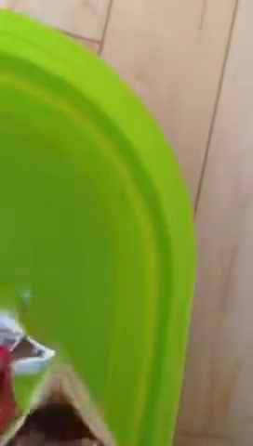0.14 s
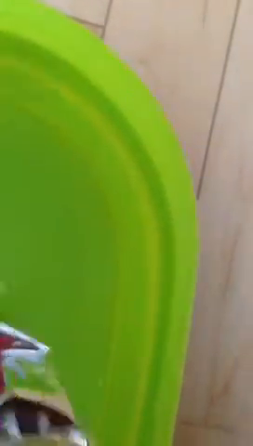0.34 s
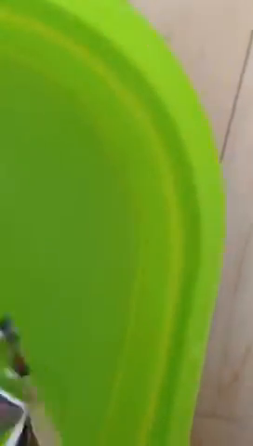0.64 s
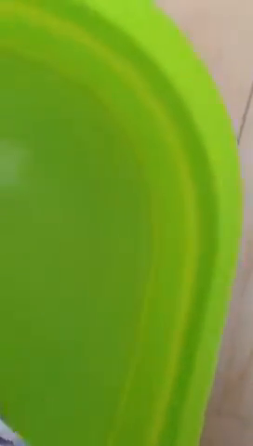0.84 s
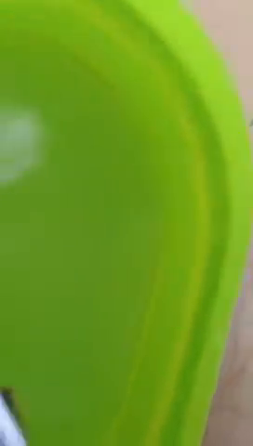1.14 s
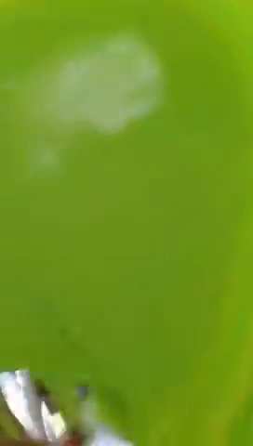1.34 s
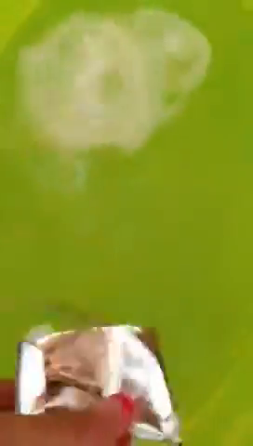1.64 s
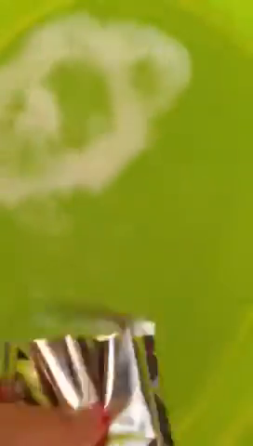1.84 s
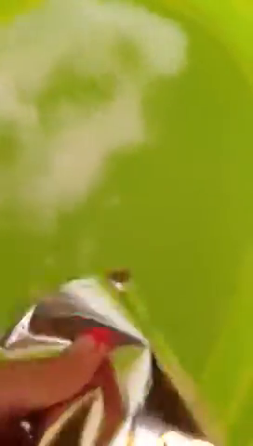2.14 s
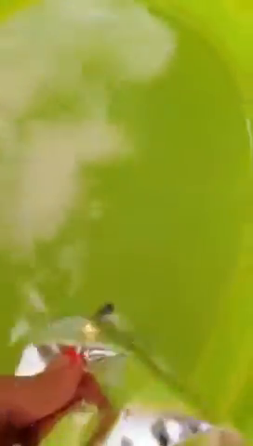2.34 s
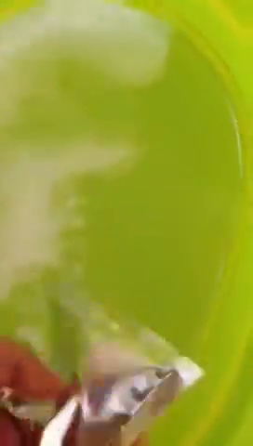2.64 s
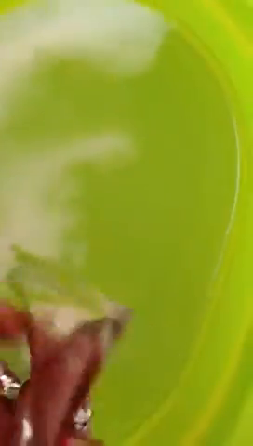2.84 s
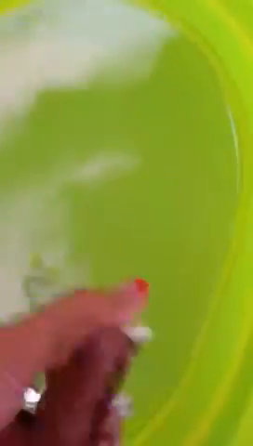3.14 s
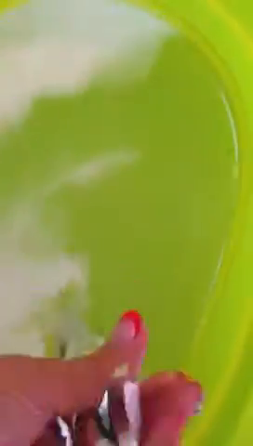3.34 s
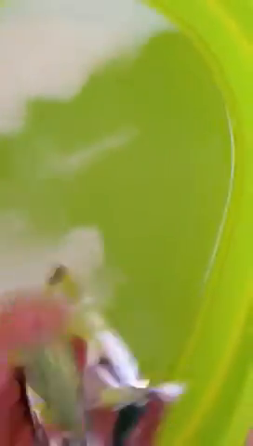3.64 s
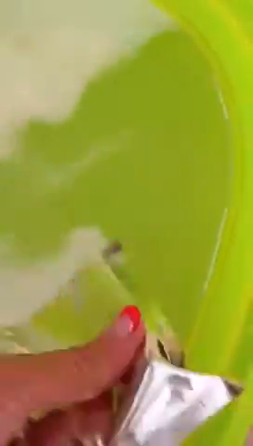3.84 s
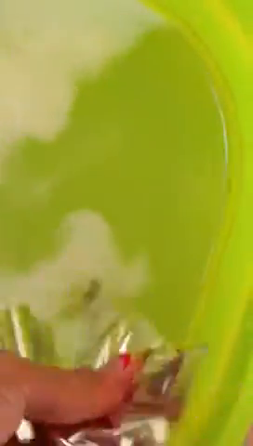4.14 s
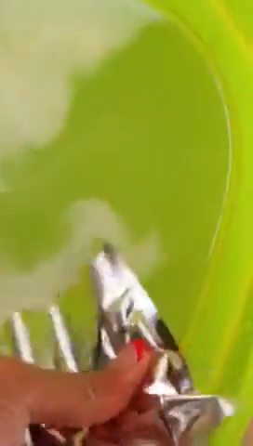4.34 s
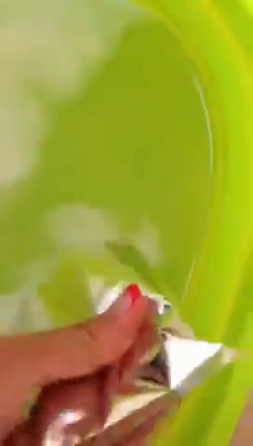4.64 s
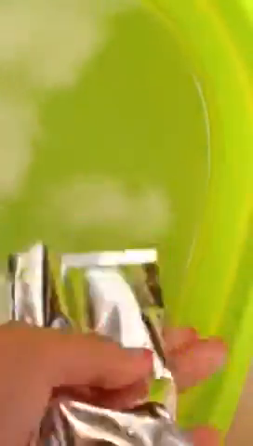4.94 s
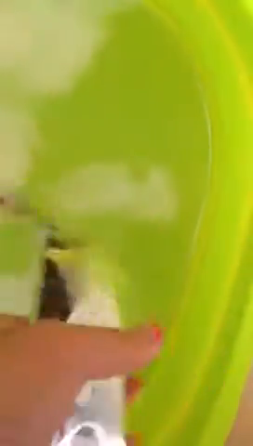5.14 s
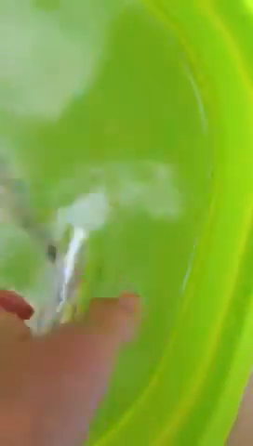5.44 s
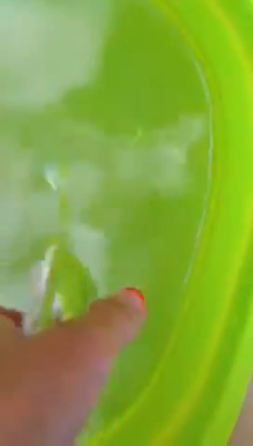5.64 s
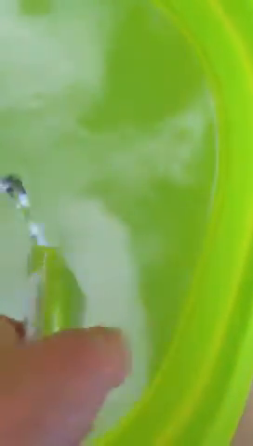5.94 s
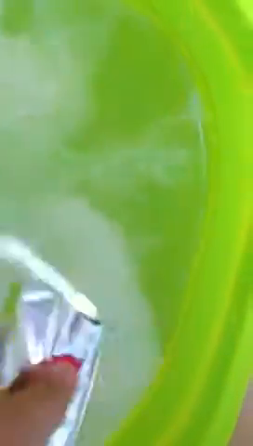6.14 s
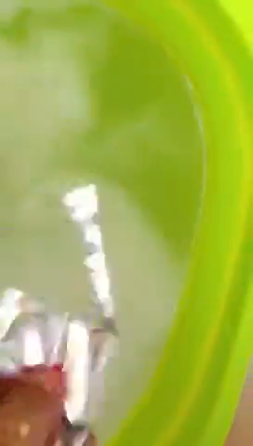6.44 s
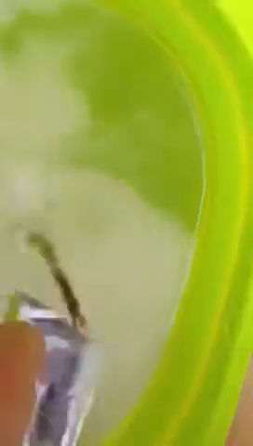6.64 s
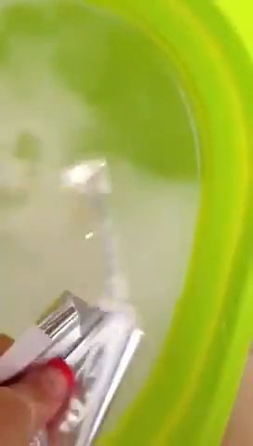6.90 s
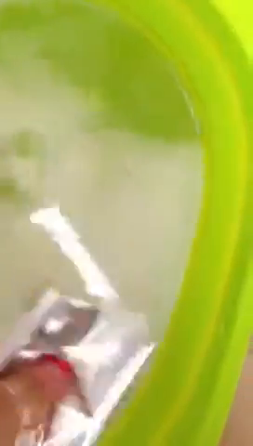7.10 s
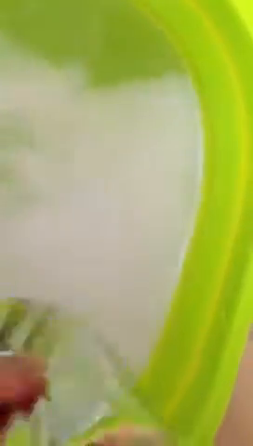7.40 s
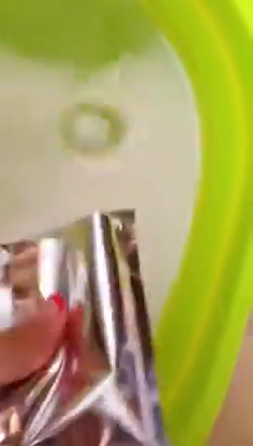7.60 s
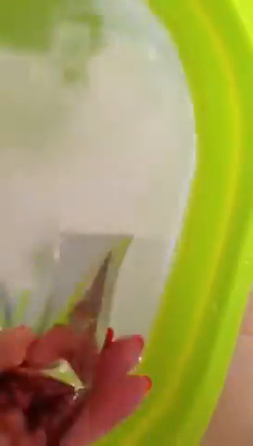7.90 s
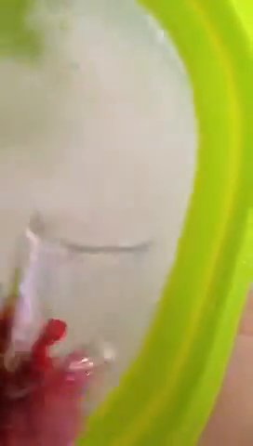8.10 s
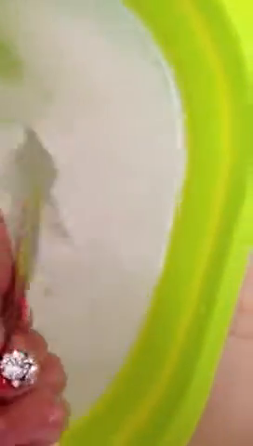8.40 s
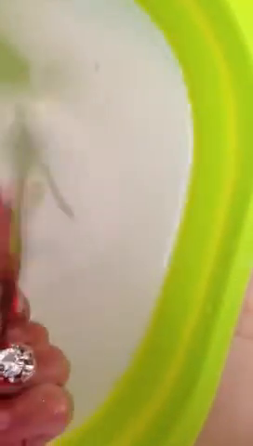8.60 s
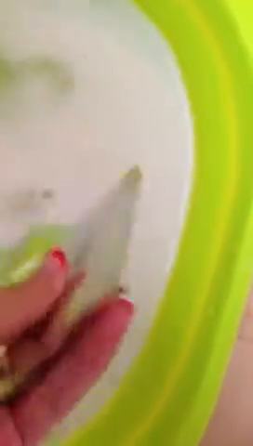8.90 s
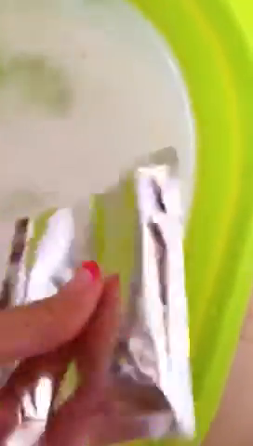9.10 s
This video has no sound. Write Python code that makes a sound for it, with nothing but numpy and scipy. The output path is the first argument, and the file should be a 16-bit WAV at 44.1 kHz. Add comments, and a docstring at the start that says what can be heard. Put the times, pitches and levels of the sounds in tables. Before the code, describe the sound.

A foil packet crackles and snaps sharply up close while powder poured into a basin of water swells into a fine, steady fizzing hiss.

```python
"""A foil sachet is squeezed, torn wider and shaken out over a plastic basin of water in a small room.
From the start its creases snap and rustle over quiet room tone, with short rips early and late on.
Four helpings of powder then land in turn, each swelling into a fine hiss of merged bubble bursts.
Meanwhile fingers tap the hollow packet, as noise pushes through a low resonance.
In the last few seconds a lower hiss of bigger bubbles grows as the foam spreads; a light tap ends it."""
import sys
import numpy as np
from scipy import signal
from scipy.fft import rfft, irfft, next_fast_len
from scipy.io import wavfile

SR = 44100
rng = np.random.default_rng(int(sys.argv[2]) if len(sys.argv) > 2 else 0)


def persist_wave(psi):
    """Save psi, clipped to +-1, as 16-bit WAV."""
    counts = np.round(np.clip(psi, -1, 1) * 32767).astype(np.int16)
    wavfile.write(sys.argv[1], SR, np.atleast_2d(counts).T)


N = 408366
TIME = np.arange(N) / SR
CUTOFF_HZ = 15350

# Loudest creases snapping through; body is the lows and crispness the top octave, relative to the mids:
# (time [s], level [dB], facet pitch [Hz], body [dB], crispness [dB])
LOUD_SNAPS = [(.111, -23.5, 4530, -16, -33), (0.1204, -30.5, 5900, -2, 0), (.157, -27.5, 4930, -9, -7),
              (0.193, -29.5, 3740, -21, -11), (0.2294, -32, 4600, -8, -15), (.251, -33.5, 4350, -12, 0),
              (0.2794, -40, 1220, -3, -9), (.388, -29, 8000, -1, -14), (0.4712, -37, 1670, -3, -8),
              (0.5113, -38, 4730, 5.5, -22), (0.5343, -32.5, 2360, -14, -32), (0.6238, -31, 6900, -9, -4),
              (0.6455, -25, 3970, -7, -6), (0.7031, -29.5, 2300, -14, -12),
              (0.708, -21.5, 5300, -11.5, -18), (.7157, -27, 6900, -21, -2), (0.7925, -32, 2430, -25, -4),
              (.802, -38.5, 860, 20, -10), (.8191, -22.5, 8150, -9, 2), (.84, -33, 1140, -2.5, -8),
              (0.9281, -32, 2520, -14, -26), (0.946, -33, 7600, -4, -3), (0.9503, -27, 4760, -26, -10),
              (.9788, -29.5, 5000, -9, -12), (1.0667, -34.5, 4630, -22, -16),
              (1.0789, -28, 4700, -7.5, -16), (1.1436, -28.5, 4060, -14, -47),
              (1.2432, -35.5, 1440, -7, -26), (1.2612, -37, 3490, -19, -34), (1.3112, -23, 6340, -13, -10),
              (1.3534, -31.5, 2360, -6, -12), (1.4603, -36, 6350, -7, -28), (1.4963, -32.5, 7500, -10, -12),
              (1.5494, -26, 3520, -9, 3.5), (1.697, -33, 3920, -30, -30), (1.718, -31, 6300, -11, -16),
              (1.7604, -24.5, 2300, -6, -10), (1.9374, -26.5, 1990, -5.5, -7),
              (2.2313, -37.5, 1070, -2, -24), (2.2661, -25.5, 3250, -8.5, -20),
              (2.467, -36.5, 2140, -1.5, -37), (2.5452, -18.5, 7500, -11, -6),
              (2.5922, -30.5, 2980, -13, -8), (2.7444, -27.5, 2870, -8.5, -7),
              (2.9299, -31.5, 4360, -16, -27), (2.944, -34, 3500, -14, -33),
              (3.1393, -29.5, 3600, -15, -38), (3.162, -30.5, 2480, -10.5, -30),
              (3.218, -35.5, 2150, -9, -27), (3.2707, -31.5, 2300, -5, -26), (3.2825, -29.5, 7940, -11, -6),
              (3.364, -31, 2420, -13, -22), (3.3957, -29, 3100, -8, -12), (3.4193, -33.5, 5210, -23, -21),
              (3.4474, -27, 2560, -9, -30), (3.4705, -25.5, 5340, -32, -35), (3.5315, -30, 1350, -4.5, -29),
              (3.7164, -36, 2370, -2, -40), (3.81, -33, 2290, -7.5, -30), (3.9088, -27.5, 2560, -19, -13),
              (3.9419, -29, 7200, -26, -26), (3.9787, -28, 5460, -13.5, -40), (4.058, -25.5, 4840, -9, -23),
              (4.0658, -26, 5710, -9, -3), (4.102, -25, 6550, -8, -12), (4.1158, -27, 8200, -5, 3),
              (4.1266, -29, 4890, -11, -12), (4.1751, -20, 6400, -17, -12), (4.1805, -23, 1290, -7, -20),
              (4.309, -25.5, 6400, -13, -7), (4.528, -36, 4850, 1.5, -18), (4.6913, -27.5, 3860, -22, -23),
              (4.747, -37, 2200, -3, -11), (4.7639, -28.5, 7400, -11.5, -22), (4.836, -33, 1860, -11, -11),
              (4.9013, -28, 2530, -10, -9), (4.9617, -34, 4040, -9, -25), (5.0328, -26, 4450, -12, -20),
              (5.5218, -34, 4000, -8, -17), (6.0591, -38.5, 1850, -7, -17), (6.2503, -34, 4200, -4, -23),
              (6.5079, -28, 7500, -7, -20), (6.5198, -27, 3570, -7, -11), (6.5341, -30, 1860, -16, -19),
              (6.5472, -23.5, 1920, -7, -17), (6.721, -33.5, 1360, -2, -16), (6.8286, -28.5, 7550, -21, -7),
              (6.8606, -31.5, 4410, -30, -2), (6.8874, -30, 3830, -8, -25), (6.9055, -29, 8010, -11, -2),
              (7.1637, -34.5, 2730, -7, -20), (7.202, -31, 2670, -3, -19), (7.2237, -29.5, 4030, -12, -1),
              (7.3955, -32, 2730, -13.5, -4), (7.456, -27.5, 3900, -8, -4), (7.524, -23, 5100, -14, -3),
              (7.738, -28.5, 6700, -7.5, -17), (7.812, -26, 4520, -14, -10), (7.826, -22, 6740, -18, 2),
              (7.846, -24.5, 2630, -18, -22), (7.8703, -21, 7620, -15, -9), (8.3245, -35.5, 7150, -8, -17)]
# Foil ripping in a quick run of slips: (time [s], length [s], level [dB])
FOIL_RIPS = [(0.215, 0.056, -42.5), (1.737, 0.055, -39.5), (6.504, 0.064, -32.5), (7.829, 0.03, -34.5)]
# Fingers tapping the slack packet: (time [s], peak level [dB], pitch [Hz], scuff gain [ratio])
FINGER_TAPS = [(3.362, -28, 620, .3), (3.396, -38, 650, 0.16), (3.421, -33, 636, 0.31),
               (3.427, -37.5, 297, 0.028), (5.52, -30.5, 1220, 0.41), (6.355, -36.5, 910, .3),
               (6.937, -37, 1300, .6), (6.965, -38, 1020, 0.2), (7.015, -24, 845, 0.33),
               (8.001, -34, 1240, .7), (8.224, -30.5, 640, 0.2), (8.394, -33, 640, 0.071),
               (9.2, -35, 1100, 1)]
# Squeezes of the packet: (start [s], end [s], rustle level [dB])
SQUEEZES = [(0, 0.37, -53), (.61, 1.007, -53), (1.031, 1.177, -50.5), (1.27, 1.4, -46), (1.45, 1.585, -50),
            (1.65, 1.84, -48.5), (1.8, 2.093, -50.5), (3.09, 3.58, -55), (3.672, 3.99, -51),
            (4.04, 4.155, -42), (4.63, 4.8, -51), (4.98, 5.096, -45.5), (5.186, 5.365, -50),
            (6.016, 6.08, -51), (6.13, 6.294, -46.5), (6.48, 6.594, -42.5), (6.684, 6.787, -40.5),
            (6.77, 6.976, -45.5), (7.1, 7.31, -50.5), (7.4, 7.55, -49.5), (7.645, 7.792, -49.5),
            (8.2, 8.279, -49.5)]
# Helpings of powder landing in the water; hiss level before swell and fade: (time [s], level [dB])
POWDER_POURS = [(1.1, -47), (2.9, -45), (4.451, -43), (5.7, -48.5)]

# Spectral shapes, all as (frequency [Hz], gain [dB]).
# Fine bubbles, also the powder sliding in the packet
FINE_FIZZ_COLOUR = [(1500, -24.5), (3000, -10), (4200, -5.5), (5100, -5.5), (5700, -4), (7000, -2),
                    (8400, -2), (9300, -6), (10000, -7.5), (12000, -4.5), (15300, -4)]
# Bigger foam bubbles
FOAM_FIZZ_COLOUR = [(900, -9), (1800, -13), (2300, -10.5), (2700, -7), (3600, -4.5), (4700, -1.5),
                    (5700, -5), (6700, -4.5), (8200, -7), (10000, -19), (15000, -29)]
# Packet walls catching and rubbing
WALL_RUSTLE_COLOUR = [(60, -40), (200, -22), (450, -3.5), (650, -2), (1000, 0.5), (1400, 1.5), (1900, -4),
                      (2400, -5), (3000, -4), (5000, -3), (8000, -23), (10000, -46), (15000, -36)]
# Rips, tiny creases and the all-round sound of the snaps
FOIL_CRACKLE_COLOUR = [(60, -38), (300, 0.5), (650, 1.5), (1500, -1), (2400, -3.5), (3000, 2), (5000, 2),
                       (5700, 2.5), (8200, 1.5), (9800, -17.5), (12000, -0.5), (15000, -7)]
# Steady background of the quiet room
ROOM_TONE_COLOUR = [(25, -32), (60, -23), (75, -21), (98, -6.5), (125, -10.5), (170, -0.5), (230, -0.5),
                    (320, -2.5), (420, -8), (700, -7), (1500, -15.5), (4000, -18), (9000, -58),
                    (15000, -44)]
# Reflections and tail of the room
ROOM_ECHO_COLOUR = [(100, 22), (500, -5), (670, 5), (850, -6), (1400, -0.5), (2300, 4.5), (3000, 3.5),
                    (5000, 0), (8000, 7), (16000, -1.5)]
# Microphone resonances added to the whole sound: (frequency [Hz], width [Hz], gain [dB])
MICROPHONE_RESONANCES = [(1830, 460, -3), (2300, 190, -3.5), (4960, 97, -7)]

# Small, tight facets are bright, large slack ones dull; the highs are relative to the mids
MIDDLE_FACET_HZ = 4000
HIGHS_DB, HIGHS_DB_PER_OCTAVE, HIGHS_FOLLOW_CRISPNESS = 1.5, 6, 0.15
# Lesser creases give way at random during a squeeze; their level is relative to its rustle
LESSER_PER_S, LESSER_DB, LESSER_SPREAD_DB = 8.3, 10, 3
LESSER_HZ, LESSER_SPREAD_OCTAVES = 3600, 0.68
LESSER_BODY_DB, LESSER_CRISPNESS_DB = -6.5, -25
# Each helping swells as it gets wet, then is slowly used up
SWELL_S, FADE_DB_PER_S = 0.76, 0.45
# Bigger bubbles: a small share of the hiss at first, then more once the foam covers the water
BIG_SHARE_DB, FOAM_FROM_S = -18, 5.87
FOAM_DB, FOAM_GROWTH = -51, 0.7   # level after one second; power of the foam's age


def from_db(db):
    """Decibels to gain."""
    return 10 ** (np.asarray(db) / 20)


def rms_one(x):
    """Scale to unit rms."""
    return x / np.sqrt(np.mean(x ** 2) + 1e-20)


def energy_one(x):
    """Scale to unit energy."""
    return x / np.sqrt(np.sum(x ** 2) + 1e-20)


def dying(t, t60):
    """Envelope that falls 60 dB in t60 seconds."""
    return np.exp(-np.log(1000) * t / t60)


def add(track, s, sound):
    """Mix a sound into the track at time s."""
    start = max(0, int(s * SR))
    track[start:start + len(sound)] += sound[:N - start]


def butter(hz, kind, order=2):
    """Butterworth sections."""
    return signal.butter(order, np.clip(hz, 10, .45 * SR), kind, fs=SR, output="sos")


def resonate(x, hz, width_hz):
    """One resonance, gain about 1 at its peak."""
    r = np.exp(-np.pi * width_hz / SR)
    feedforward = np.array([1, 0, -1]) * (1 - r * r) / 2
    feedback = [1, -2 * r * np.cos(2 * np.pi * hz / SR), r * r]
    return signal.lfilter(feedforward, feedback, x + 1e-18)


def coloured(x, spectrum):
    """Shape a noisy signal with a gain curve over log frequency; rms 1."""
    size = next_fast_len(len(x))
    hz, db = np.transpose(spectrum)
    bins = np.maximum(np.arange(size // 2 + 1) * SR / size, 1)
    gain = from_db(np.interp(np.log(bins), np.log(hz), db))
    return rms_one(irfft(rfft(x, size) * gain, size)[:len(x)])


def grains(per_s, spread_db, low_hz, high_hz, cycles, size=N, count=16):
    """Random clicks of uneven size, each ringing a few cycles at one of many pitches; rms 1."""
    clicks = (rng.random(size) < per_s / SR) * rng.choice([-1, 1], size)
    clicks = clicks * from_db(spread_db * np.minimum(rng.exponential(1, size), 4))
    dealt = rng.integers(0, count, size)
    pitches = np.geomspace(low_hz, min(high_hz, CUTOFF_HZ), count)
    return rms_one(sum(resonate(clicks * (dealt == k), hz, hz / cycles) for k, hz in enumerate(pitches)))


def room_tone(level_db=-59):
    """Steady noise shaped into the hush of the quiet room."""
    return from_db(level_db) * coloured(rng.standard_normal(N), ROOM_TONE_COLOUR)


def room(x, early_db=-14, early_t60=0.091, late_db=-13, late_t60=0.37):
    """Quick reflections from basin and floor, then the soft tail of the room."""
    t = np.arange(SR // 2) / SR
    arrival = np.clip(t / .005 - .5, 0, 1)   # echoes fade in from 2.5 to 7.5 ms
    early, late = (arrival * coloured(rng.standard_normal(len(t)), ROOM_ECHO_COLOUR) for _ in range(2))
    early = from_db(early_db) * energy_one(early * dying(t, early_t60))
    late = from_db(late_db) * energy_one(late * dying(t, late_t60))
    return signal.fftconvolve(x, early + late)[:N]


def fizz():
    """Gas bubbles burst so densely that they merge into a hiss; bigger ones sound lower."""
    power = 0
    for s, db in POWDER_POURS:
        age = np.maximum(TIME - s, 0)
        swell = 1 - np.exp(-age / SWELL_S)
        power = power + (from_db(db - FADE_DB_PER_S * age) * swell) ** 2
    hiss = np.sqrt(power)
    thickening = from_db(FOAM_DB) * np.maximum(TIME - FOAM_FROM_S, 0) ** FOAM_GROWTH
    fine = coloured(grains(14000, 0.56, 2340, 13400, cycles=0.81), FINE_FIZZ_COLOUR)
    foam = coloured(grains(9000, 0.8, 1440, 15000, cycles=1.15), FOAM_FIZZ_COLOUR)
    return hiss * fine + np.hypot(from_db(BIG_SHARE_DB) * hiss, thickening) * foam


def rustle(rub_db=-2, holding_db=-65):
    """With each squeeze the two walls of the packet catch and rub on each other, and the powder slides."""
    squeeze = np.full(N, from_db(holding_db))
    for start, end, db in SQUEEZES:
        size = max(int((end - start) * SR), 2)
        add(squeeze, start, from_db(db) * signal.windows.tukey(size, .6))
    catches = grains(400, 6.0, 600, 9100, cycles=5.5)
    rub = grains(5000, 1.5, 590, CUTOFF_HZ, cycles=1.2)
    walls = coloured(catches + from_db(rub_db) * rub, WALL_RUSTLE_COLOUR)
    powder = coloured(rng.standard_normal(N), FINE_FIZZ_COLOUR)   # as loud as the walls
    return squeeze * (walls + powder)


def taps(knock_cycles=3, contact_hz=3000, decay_cycles=23):
    """A fingertip knocks the slack packet: a scuff of contact and a dull hollow note."""
    out, t = np.zeros(N), np.arange(4096) / SR
    rattles = rng.standard_normal((len(FINGER_TAPS), len(t)))
    for (s, db, hz, scuff), rattle in zip(FINGER_TAPS, rattles):
        contact = butter([hz / 2, max(contact_hz, hz)], "band")
        push = signal.sosfilt(contact, rattle * dying(t, decay_cycles / hz))
        note = resonate(resonate(push, hz, hz / knock_cycles), hz, hz)
        knock = note + scuff * push
        add(out, s, from_db(db) * knock / np.abs(knock).max())
    return out


def rips(slips_per_s=3500):
    """The foil gives way in a dense run of tiny slips that swells and fades."""
    out = np.zeros(N)
    for s, length, db in FOIL_RIPS:
        slips = grains(slips_per_s, 0.65, 570, 6900, cycles=0.55, size=4096)
        size = int(np.clip(length * SR, 64, 4096))
        run = coloured(slips, FOIL_CRACKLE_COLOUR)[:size] * signal.windows.tukey(size, .5)
        add(out, s, from_db(db) * rms_one(run))
    return out


def crackle(crackle_db=-52, spread_s=0.027):
    """Where big creases give way, swarms of tiny ones go just before and after them."""
    s, db = np.transpose(LOUD_SNAPS)[:2]
    coarse = TIME[::100]
    strain = from_db(db - db.mean()) @ np.exp(-np.abs(coarse - s[:, None]) / spread_s)
    ticks = coloured(grains(350, 3.5, 900, 12000, cycles=1.6), FOIL_CRACKLE_COLOUR)
    return from_db(crackle_db) * np.sqrt(np.interp(TIME, coarse, strain)) * ticks


def creases():
    """The loud snaps, and lesser ones scattered through each squeeze; rows as in LOUD_SNAPS."""
    rows = list(LOUD_SNAPS)
    for start, end, db in SQUEEZES:
        waits, chance = rng.exponential(1, 16), rng.standard_normal((16, 3))
        times = start + np.cumsum(waits) / LESSER_PER_S
        for s, (size, pitch, edge) in zip(times, chance):
            if s < end:
                level_db = db + LESSER_DB + LESSER_SPREAD_DB * size
                hz = np.clip(LESSER_HZ * 2 ** (LESSER_SPREAD_OCTAVES * pitch), 900, 8500)
                rows.append((s, level_db, hz, LESSER_BODY_DB, LESSER_CRISPNESS_DB + 5 * edge))
    return np.array(rows)


def highs_db(hz, crispness_db):
    """Level of a snap's highs, from the pitch of its facet and its crispness."""
    octaves = np.log2(hz / MIDDLE_FACET_HZ)
    return HIGHS_DB + HIGHS_DB_PER_OCTAVE * octaves + HIGHS_FOLLOW_CRISPNESS * crispness_db


def snaps(rows, scatter=0.13, scatter_t60=0.018, facet_db=3):
    """A crease flips: one sharp pulse, a flutter through the sheet, and a brief ring of the facet it bounds."""
    out, t = np.zeros(N), np.arange(1024) / SR
    bands = [butter([450, 1500], "band")]   # body, then mids, highs and crispness
    bands += [butter(edges, "band", order=3) for edges in ([1500, 5000], [5000, 8700], [9500, 16000])]
    flutters = rng.standard_normal((256, len(t)))
    for (s, db, hz, body_db, crispness_db), flutter in zip(rows, flutters):
        pulse = (t == 0) + scatter * flutter * dying(t, scatter_t60)
        pulse = pulse + from_db(facet_db) * resonate(pulse, hz, hz / 5)
        gains = from_db([body_db, 0, highs_db(hz, crispness_db), crispness_db])
        snap = sum(gain * energy_one(signal.sosfilt(band, pulse)) for band, gain in zip(bands, gains))
        # the level is the rms of 200 samples
        add(out, s, from_db(db) * np.sqrt(200) * energy_one(snap))
    return out


def all_round(rows, snapping, brightness=0.78, own_share=0.62):
    """Facets beam their own colour at the microphone; summed all round, snaps are broader and plainer."""
    s, db, hz, _, crispness_db = np.transpose(rows)
    at = (s * SR).astype(int)
    lows, highs = np.zeros((2, N))
    lows[at] = from_db(db)
    highs[at] = from_db(db + brightness * highs_db(hz, crispness_db))
    clicks = signal.sosfilt(butter(5000, "low", order=3), lows + 1e-18)
    clicks = clicks + signal.sosfilt(butter(5000, "high", order=3), highs + 1e-18)
    return np.std(snapping) * coloured(clicks, FOIL_CRACKLE_COLOUR) + own_share * snapping


def scene():
    """Foil close by, the basin below it and the quiet room, the same in both channels."""
    rows = creases()
    snapping = snaps(rows)
    handling = rips() + taps() + rustle() + crackle()
    foil = snapping + handling + room(all_round(rows, snapping) + handling)
    mono = foil + fizz() + room_tone()
    return np.array([mono, mono])


def record(dry):
    """The microphone rings faintly at a few pitches; the top is cut steeply."""
    ringing = sum(from_db(db) * resonate(dry, hz, width) for hz, width, db in MICROPHONE_RESONANCES)
    top_cut = signal.ellip(10, .2, 70, CUTOFF_HZ, fs=SR, output="sos")
    return signal.sosfilt(top_cut, dry + ringing)


dry = scene()
out = record(dry)
persist_wave(out)
```